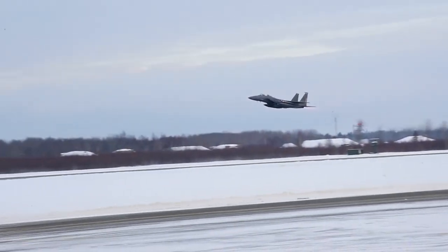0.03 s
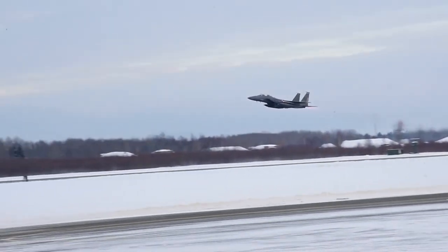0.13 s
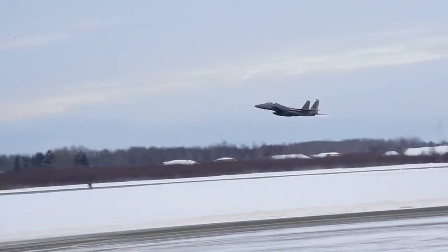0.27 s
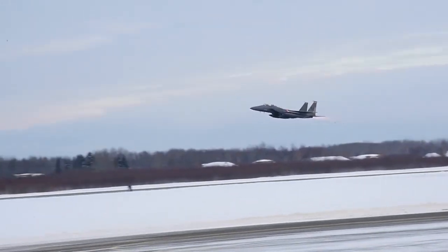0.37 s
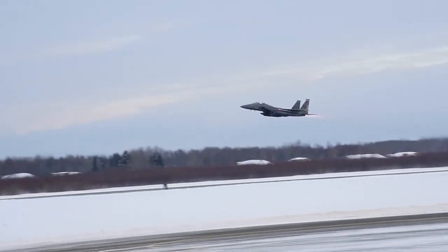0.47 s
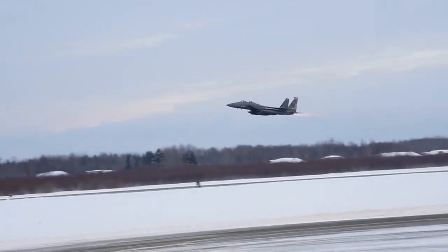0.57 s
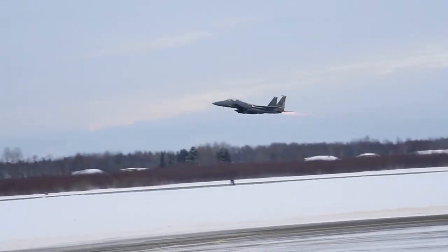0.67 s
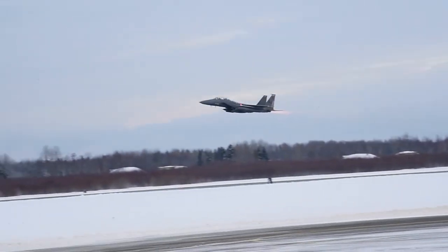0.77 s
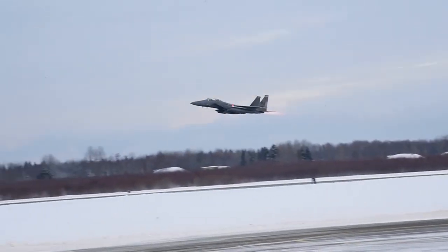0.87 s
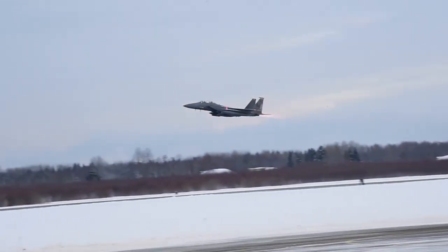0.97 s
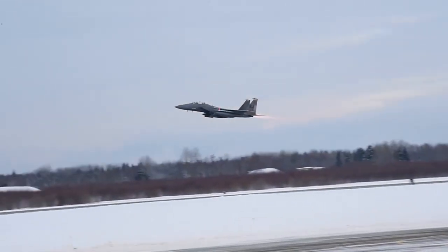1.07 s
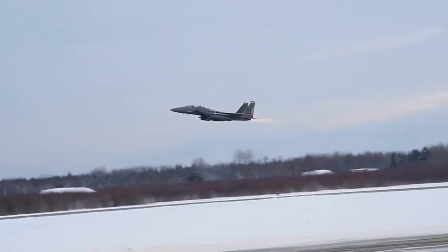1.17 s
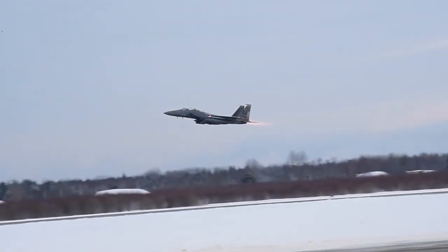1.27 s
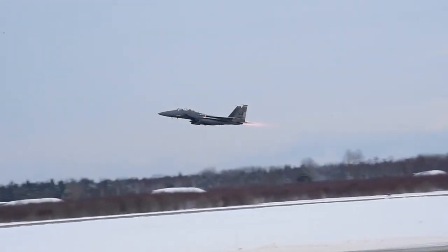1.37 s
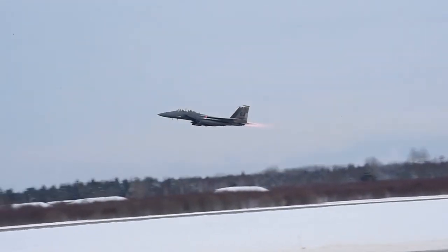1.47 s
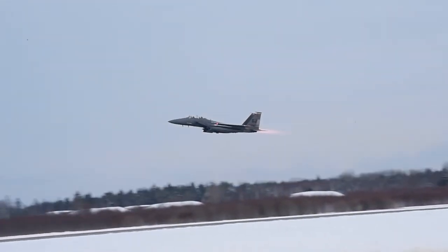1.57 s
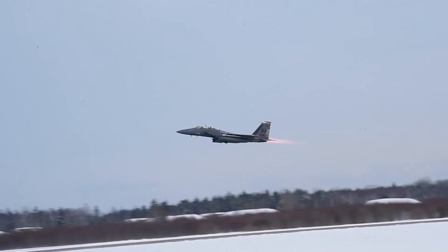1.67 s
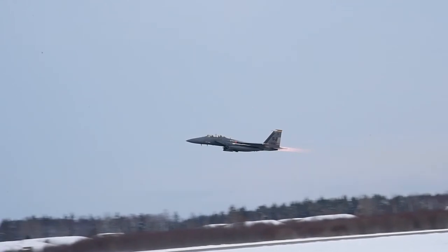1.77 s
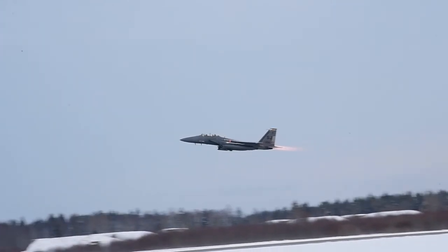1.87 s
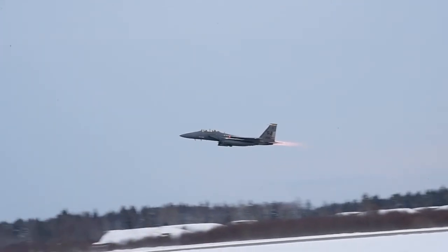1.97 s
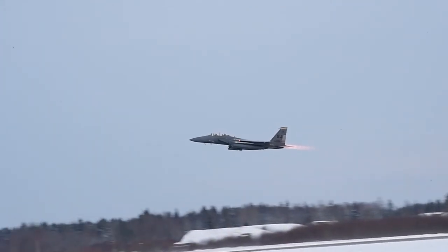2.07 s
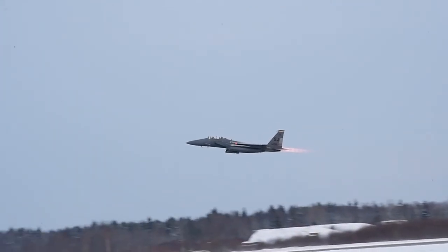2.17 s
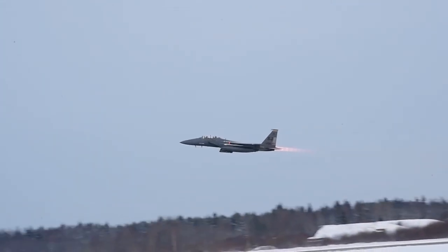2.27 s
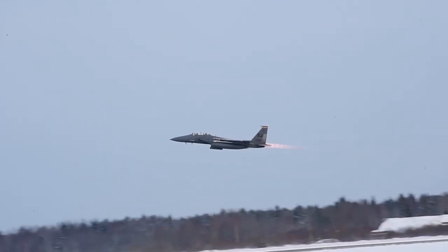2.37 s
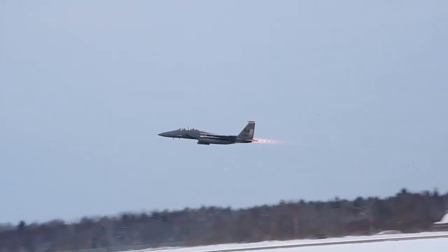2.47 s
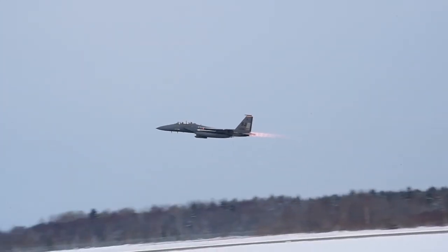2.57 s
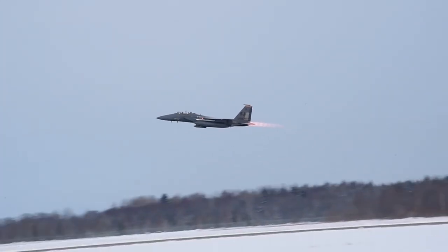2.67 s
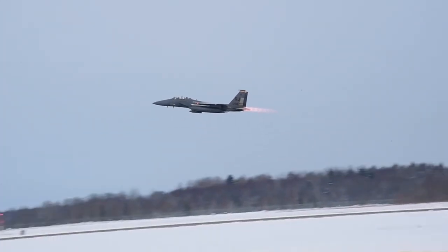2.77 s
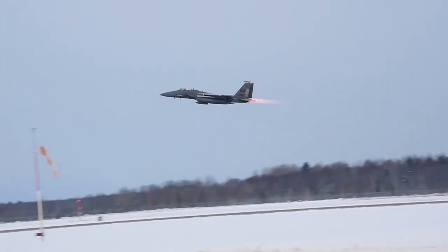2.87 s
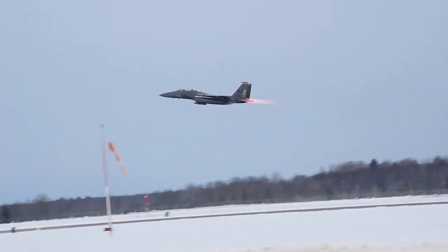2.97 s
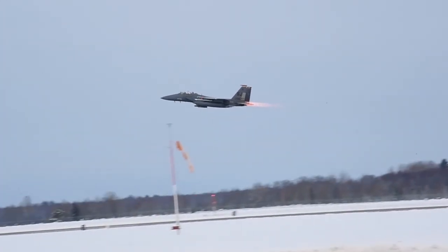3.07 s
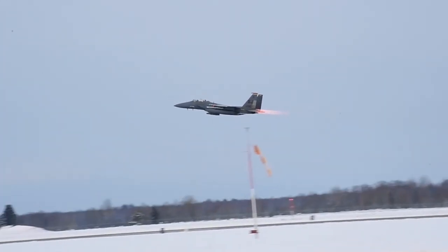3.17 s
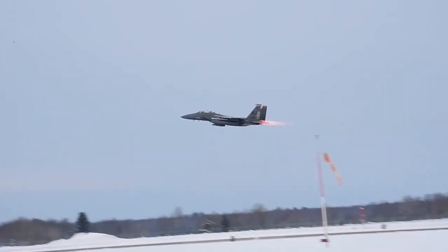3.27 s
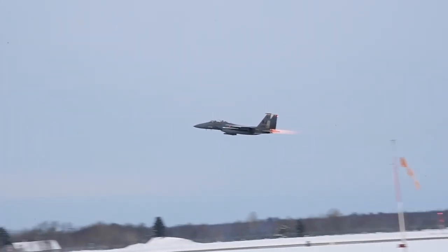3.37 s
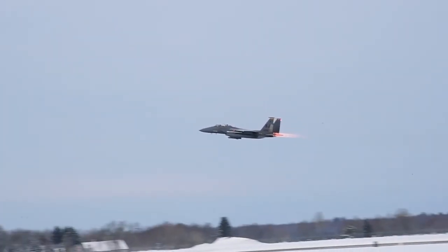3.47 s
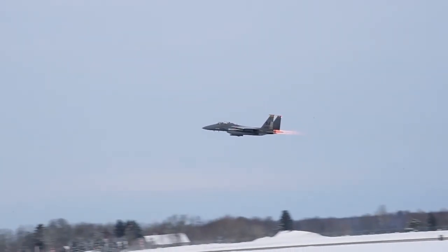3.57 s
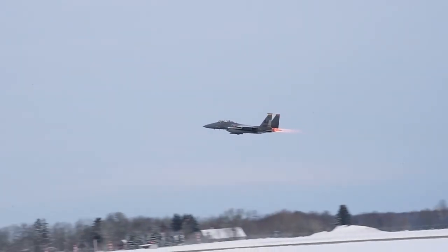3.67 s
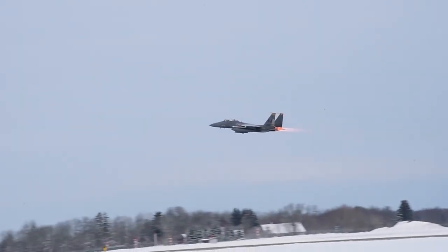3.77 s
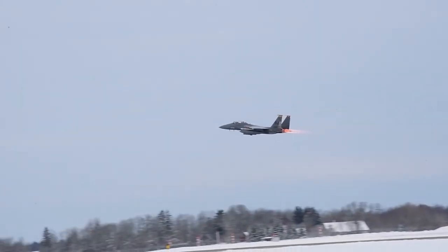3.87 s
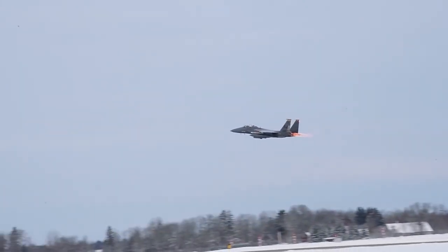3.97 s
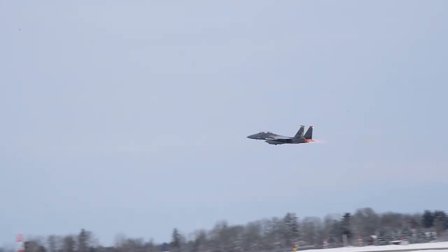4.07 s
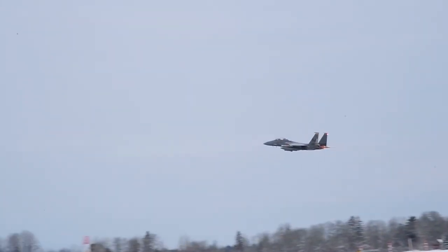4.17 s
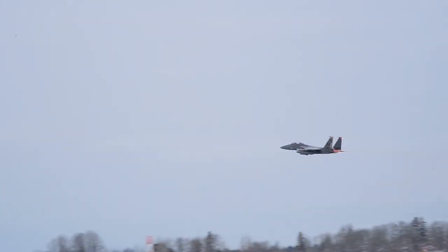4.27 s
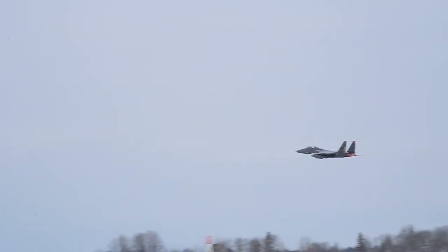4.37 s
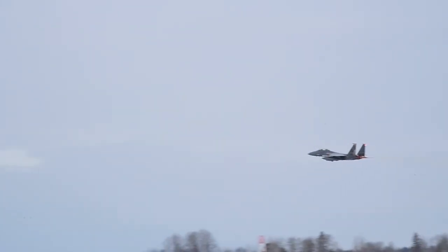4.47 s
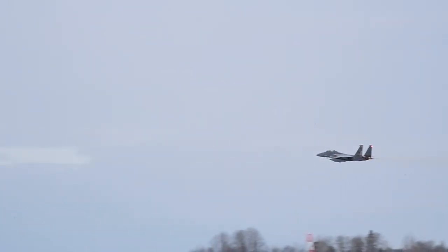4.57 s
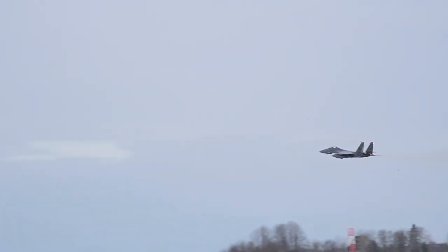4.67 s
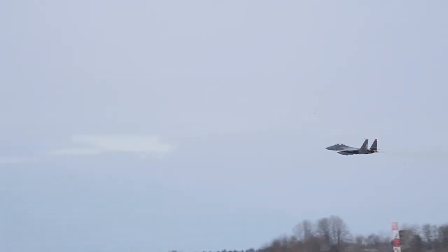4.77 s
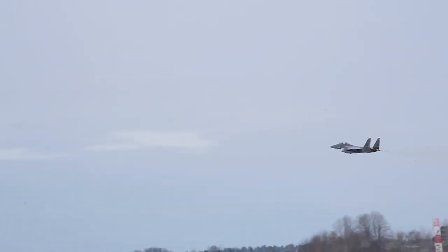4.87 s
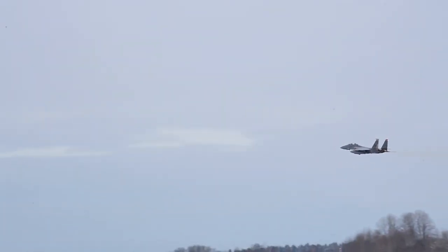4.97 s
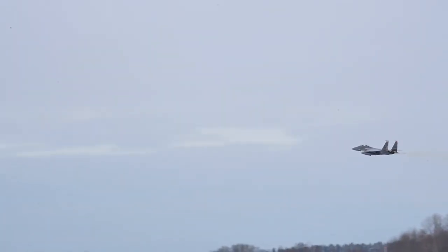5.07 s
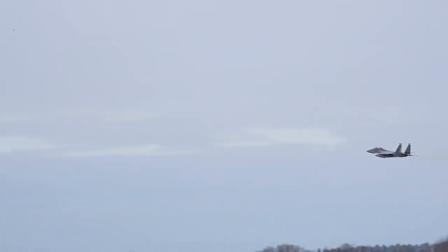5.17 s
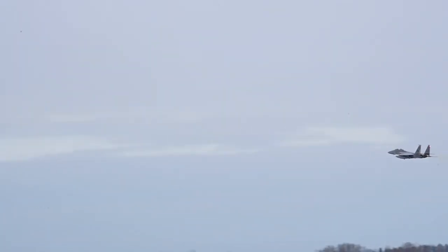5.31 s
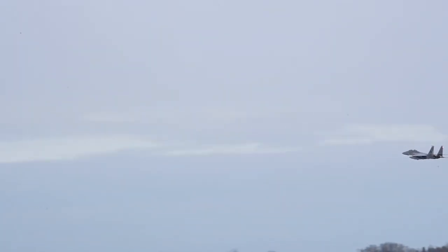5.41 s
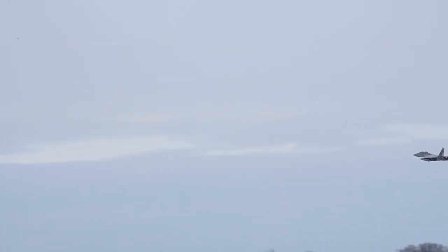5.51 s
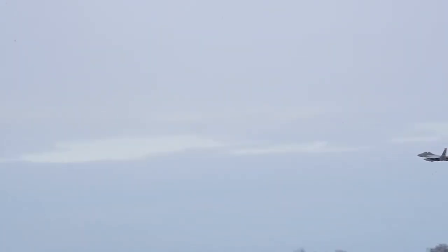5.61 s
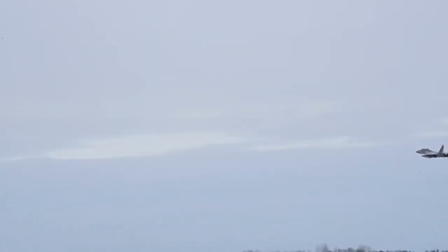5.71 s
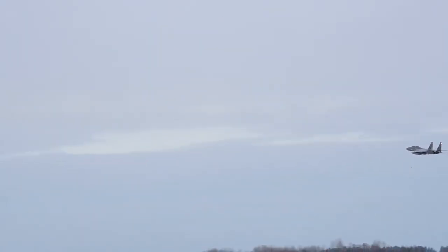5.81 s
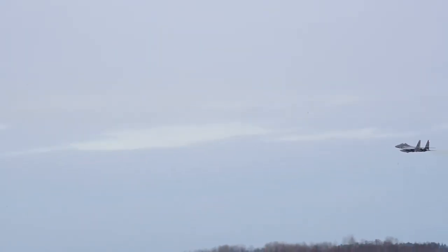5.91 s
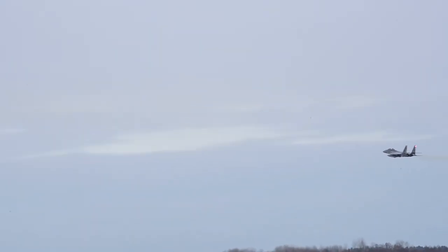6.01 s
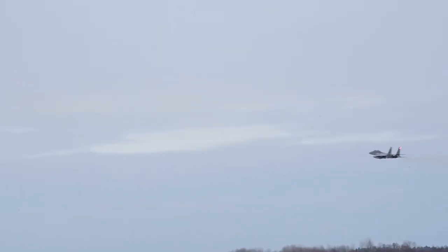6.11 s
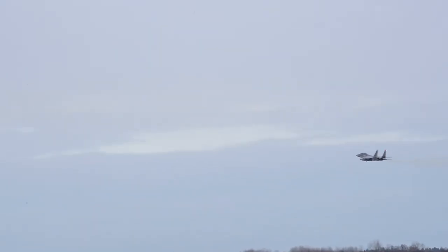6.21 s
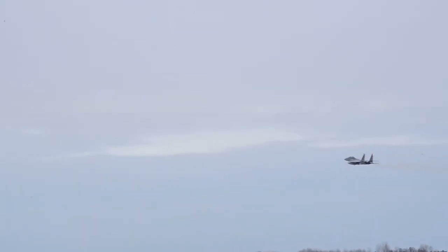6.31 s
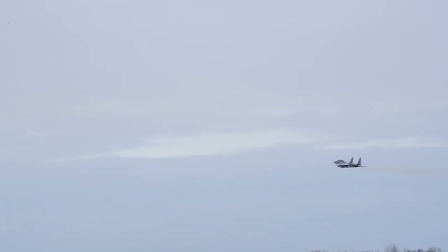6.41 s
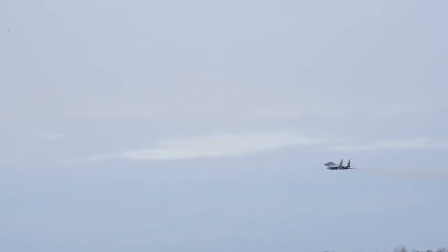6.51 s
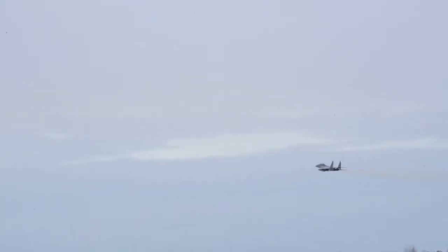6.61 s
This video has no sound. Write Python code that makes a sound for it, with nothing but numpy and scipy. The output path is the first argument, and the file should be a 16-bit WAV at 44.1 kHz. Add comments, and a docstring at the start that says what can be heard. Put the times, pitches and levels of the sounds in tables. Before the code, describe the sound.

A twin-engined fighter jet's afterburner roar swells from a dull rumble to a loud ripping, crackling blast, then stays heavy until an abrupt end.

```python
"""Jet exhaust: a twin-engined fighter lifts off on afterburner and climbs past over an open snowy airfield.
The roar is shaped noise in three bands: a howl that swells as the jet comes abeam, a rasp of fine turbulence
and a deep rumble that grows as the nozzles swing round. An uneven train of shock fronts makes it rip and
crackle, with single sharp cracks on top; faint bands of noise fade early and dull thunder comes off the field.
A closely spaced microphone pair hears it from the right, through a lag, a balance and scattered treble."""
import sys
import numpy as np
from scipy import signal
from scipy.fft import rfft, irfft
from scipy.io import wavfile
from scipy.ndimage import uniform_filter1d, minimum_filter1d

SR = 44100
rng = np.random.default_rng(int(sys.argv[2]) if len(sys.argv) > 2 else 0)


def digitize_waveform(pressure):
    """Quantize a signal to 16-bit integers and store it at the path in sys.argv[1].

    Rows of a 2-D input are taken as channels; values are limited to [-1, 1].
    """
    field = np.atleast_2d(pressure).T
    bounded = np.clip(field, -1, 1)
    quanta = np.round(bounded * 32767).astype(np.int16)
    wavfile.write(sys.argv[1], SR, quanta)


N = 293265  # length [samples]

# filter frames [samples], their times [s] and the frequencies of their bins [Hz]
FRAME, HOP = 2048, 256
FRAME_S = np.arange(N // HOP + 2) * HOP / SR
BIN_HZ = np.maximum(np.arange(FRAME // 2 + 1) * SR / FRAME, 1)

# moving air focuses the roar into brief surges or, with negative rises, thins it:
# (middle [s], length [s], rise of the roar [dB], rise of the crackle [dB])
SURGES = [(0.0, 0.027, 8.5, -1), (0.36, 0.06, 1.5, 6), (0.425, 0.039, 4, 0), (0.508, 0.085, 5, 11),
          (0.894, 0.06, 2.5, 6), (0.963, 0.045, 8, 11), (1.025, 0.1, 6, 4), (1.122, 0.1, 2, 9),
          (1.266, 0.17, 2.5, 6), (1.37, 0.057, 4.5, 18), (1.419, 0.062, 7.5, 12), (1.622, 0.15, 6.5, 20),
          (1.74, .08, -0.5, 0), (1.868, 0.11, 1.5, 9), (1.98, 0.06, 0.5, 7.5), (2.311, 0.17, 0.5, 9),
          (2.422, .06, -2, -4), (2.536, 0.13, 0.1, 6), (2.773, 0.054, 2.5, 4.5), (2.814, 0.063, -2, -10),
          (2.945, 0.44, -0.5, 3), (3.084, 0.1, -2.5, -10), (3.158, 0.046, 1, -1), (3.241, 0.045, -3.5, -15),
          (3.484, 0.17, 0.5, -2), (3.653, 0.16, -1.5, 5.5), (3.81, 0.077, 0.5, 3), (4.05, 0.068, 1, 4),
          (4.2, 0.088, 0, -1.5), (4.996, 0.07, -1, -2), (5.476, 0.11, -1.5, -3), (5.69, 0.1, 0.5, 3.5),
          (5.98, 0.13, 0.8, 5), (6.075, 0.09, -1.7, -2), (6.385, 0.073, 2, 7.5), (6.632, 0.055, 2.5, 5)]
# share of the roar's rise that these parts follow; long waves are bent less
HOWL_FOLLOWS, RUMBLE_FOLLOWS = 0.81, 0.11

# large eddies at the end of the plume, before gain and surges: (time [s], level [dB])
RUMBLE_LEVEL = [(0, -35), (0.42, -37.5), (0.7, -40.5), (1.6, -36), (2.3, -29), (2.75, -29), (2.95, -25.5),
                (3.4, -22.5), (4.2, -19), (4.6, -16.5), (5.3, -17.5), (6.1, -19), (6.6, -17)]
# rumble spectrum round its moving centre: (multiple of the centre, relative density [dB per Hz])
RUMBLE_COLOUR = [(.08, -59), (.18, -32.5), (.34, -20.5), (.52, -10), (.72, -3.5), (.95, -2), (1.25, -2),
                 (1.7, -7), (2.4, -14.5), (4.8, -56), (70, -150)]
# mixing noise of the jets, before gain and surges: (time [s], level [dB])
HOWL_LEVEL = [(0, -31.5), (0.8, -32), (0.97, -29), (1.2, -25.5), (1.5, -25.5), (1.75, -21.5), (2.3, -17),
              (2.68, -16), (2.88, -16.5), (3.15, -13.5), (3.35, -17), (3.85, -17), (4.18, -20.5),
              (4.3, -25), (4.5, -22.5), (4.65, -20.5), (4.8, -21), (5.05, -22), (5.8, -20), (6.65, -19)]
# howl spectrum round its moving centre: (multiple of the centre, relative density [dB per Hz])
HOWL_COLOUR = [(.1, -41), (.52, -13.5), (.7, -6.5), (.86, -0.5), (1, -0.5), (1.16, -1.5), (1.45, -8.5),
               (2, -12.5), (4, -44), (30, -130)]
# wavering pitch of the howl, highest near the pass abeam: (time [s], centre [Hz], width factor)
HOWL_PITCH = [(0, 527, 1.31), (.33, 580, 1.31), (.42, 413, 1.33), (.53, 565, 1.36), (1.0, 650, 1.23),
              (1.12, 660, 1), (1.25, 785, 1.28), (1.41, 605, 1.43), (1.6, 694, 1.66), (1.8, 645, 0.78),
              (2.1, 616, 0.9), (2.45, 690, 0.68), (2.68, 720.2, 0.76), (2.92, 810, 1.1),
              (3.15, 850.3, 0.95), (3.45, 765.4, 1.1), (3.8, 730, 1.02), (4.2, 627, 0.68),
              (4.45, 610, 0.79), (4.65, 688.1, 1.1), (4.85, 633, 0.86), (5.2, 610, 0.76), (5.65, 674, 0.82),
              (6.1, 580, 1.23), (6.65, 610, 0.72)]
# fine turbulence near the nozzles, before gain and surges: (time [s], level [dB])
RASP_LEVEL = [(0, -39), (0.85, -41.5), (1.2, -30.5), (1.5, -28.5), (1.75, -26.5), (2.1, -19), (2.3, -19),
              (2.6, -23.5), (2.8, -22.5), (2.97, -27.5), (3.1, -25.5), (3.28, -23), (3.41, -21), (3.5, -25),
              (3.62, -18), (3.85, -21), (4.03, -19.5), (4.2, -17), (4.35, -17.5), (4.5, -23), (4.75, -19.5),
              (4.92, -21.5), (5.3, -21), (5.47, -21.5), (5.68, -21.7), (5.85, -24.5), (6.05, -21.5),
              (6.4, -21.5), (6.55, -27), (6.65, -23.5)]
# rasp spectrum round its moving centre: (multiple of the centre, relative density [dB per Hz])
RASP_COLOUR = [(.2, -37), (.52, -17), (.73, 5.5), (1, 6), (1.3, -1), (1.6, -10.5), (2.1, -14.5), (3, -27.5),
               (5, -52), (14, -100)]
# colour as the aircraft passes:
# (time [s], rumble centre [Hz], rasp centre [Hz], rasp width factor, crackle tilt [dB per octave])
PASS_COLOUR = [(0, 215, 1220, 0.72, -6), (1.1, 205, 1255, 1.27, -7.5), (1.6, 205.6, 1420, 1.26, -6),
               (2.0, 224, 1440, 1.34, -2), (2.5, 268, 1680, 1.297, -0.9), (3.2, 268, 1950, 1.23, 1),
               (3.42, 256, 1800, 0.97, -0.5), (3.75, 266, 2000, 1.04, -1), (4.05, 267, 1570, 0.88, -1),
               (4.2, 259.8, 1400, 0.88, -0.5), (4.7, 245, 1795, 1.11, 2.5), (5.2, 234, 1690, 1.05, 3.5),
               (5.7, 256, 1784, 0.92, 2.2), (6.2, 272, 1371, 0.89, -2.5), (6.65, 254, 1520, 0.95, -6)]
RUMBLE_DB, HOWL_DB, RASP_DB = 0.5, 0.5, -0.4  # gain of each part of the roar
# the ground echo hollows the roar between howl and rasp; positive levels fill it:
# (time [s], centre [Hz], level [dB])
HOLLOW = [(0, 830, -0.5), (1.5, 795, -3), (2.1, 900, 1.5), (2.6, 1270, 2), (3.1, 1510, -6),
          (3.6, 1252, -0.5), (4.3, 969.5, 0), (5.2, 880, -1), (5.7, 1020, 0), (6.3, 880, -3.5)]
HOLLOW_OCTAVES = 0.25

# thunder from the field: (frequency [Hz], relative density [dB per Hz])
FIELD_COLOUR = [(20, -30), (45, -26), (80, -13.5), (130, 0), (200, -3), (400, -25), (2000, -70)]
# faint early bands of noise, two narrow and one broad, before their fade:
# (centre [Hz], width [Hz], level [dB])
FAINT_BANDS = [(2570, 160, -78), (4100, 300, -69), (7600, 1100, -77)]
FAINT_BANDS_END_S = 1.5

# shock fronts, their share before the bass is spared and the limits on share and power:
# (time [s], fronts per second [1/s], share of the roar [0-1], power of a front's height that gives its treble)
SHOCKS = [(0, 210, 0.2, 2), (.8, 223, 0.2, 3), (1.1, 294, 0.07, 3.5), (1.4, 356, 0.5, 4.2),
          (1.6, 427, 0.74, 5.5), (2.0, 560, 0.64, 2.6), (2.6, 504, 0.68, 3.5), (3.2, 413, 0.28, 1.78),
          (4.2, 340, 0.51, 0.95), (4.7, 311, 0.76, 0.76), (5.6, 285, 0.65, 1.1), (6.2, 263, 0.6, 2.4)]
# steep edges of the shock fronts, before gain and surges: (time [s], level [dB])
CRACKLE_LEVEL = [(0, -79), (0.8, -71), (1.2, -58), (1.5, -57.5), (1.78, -58.5), (2.1, -44.5), (3.0, -43.5),
                 (4.2, -44), (4.35, -38.5), (4.5, -41.5), (4.8, -39.5), (5.1, -41.5), (5.7, -42),
                 (5.9, -46), (6.3, -50), (6.6, -51.5)]
# spectrum of the crackle before any tilt: (frequency [Hz], relative density [dB per Hz])
CRACKLE_COLOUR = [(20, -110), (800, -26.5), (2000, 3), (3000, 3), (4200, 1), (5400, -2), (6500, -3),
                  (8000, -5.5), (10000, -14), (12500, -27.5), (15000, -37)]
# the sharpest single cracks, before the gain of their bright edge: (time [s], height of the treble [dB])
CRACKS = [(0.511, -42), (0.9592, -39), (1.2026, -39), (1.218, -31), (1.234, -30), (1.262, -31),
          (1.3089, -41), (1.362, -24), (1.3668, -27), (1.392, -26), (1.4101, -34), (1.4206, -26),
          (1.558, -33), (1.5673, -30), (1.5842, -24), (1.5919, -24), (1.6211, -16), (1.6265, -17),
          (1.6344, -19), (1.6446, -25), (1.6628, -24), (1.6723, -28), (1.7626, -31), (1.8666, -25),
          (1.8864, -25), (1.9482, -24), (1.967, -20), (1.9971, -24), (2.239, -22), (2.2722, -24),
          (2.4619, -19), (2.4862, -12), (2.507, -20), (2.6368, -12), (2.7215, -16), (2.8765, -15),
          (2.9616, -22), (2.9885, -18), (3.056, -16.5), (3.1258, -21), (3.206, -18), (3.2954, -19),
          (3.4014, -16), (3.5123, -15.5), (3.6466, -19), (3.695, -24), (4.0113, -19), (4.265, -18.5),
          (4.2906, -15), (4.9036, -14), (5.087, -20), (5.1351, -22), (5.2506, -22), (5.8091, -17),
          (5.8507, -18), (5.9222, -24), (5.9403, -22), (5.9555, -23), (5.9819, -26), (6.0218, -15),
          (6.0361, -18), (6.046, -15.5), (6.0672, -27), (6.0957, -30), (6.1889, -13.5), (6.2045, -18),
          (6.2462, -25), (6.3317, -31), (6.3704, -26), (6.396, -28), (6.4205, -22), (6.4842, -26),
          (6.5024, -27), (6.5534, -28), (6.636, -22.5)]
SWALLOW_S = 0.0019  # a crack swallows the smaller fronts within this span, centred on it

# direction of the sound:
# (time [s], factor on the lag between capsules, extra scatter [dB], left minus right to add [dB])
BEARING = [(0, 0.51, 16, 8.5), (.7, 0.69, 9, 7), (1.2, 0.79, 4, 5), (2.0, 0.96, 1.5, 4),
           (2.6, 0.97, 1.5, 3.5), (3.2, 1, 4, 4), (3.8, 0.94, 0.5, 4), (4.4, 0.89, 4.5, 4.5),
           (5.6, 0.88, 4.5, 3.5), (6.65, 0.62, 7, 5.5)]
# microphone pair, before bearing:
# (frequency [Hz], sensitivity [dB], left minus right [dB], share of scattered sound [0-1])
PAIR = [(310, -0.5, -4, 0), (730, 1.3, -5, 0), (1310, 1.5, -5.5, 0.04), (1900, 5, -7.5, 0),
        (2620, 6, -4, 0.07), (3800, 3, -4, 0.02), (5060, 4, -5.5, 0.06), (8200, -3.5, -6, 0.15),
        (13800, 9, -4, 0.12)]
# lag of the pair, before bearing: (frequency [Hz], phase by which right leads [radians])
PAIR_PHASE = [(300, 0.033), (650, 0.4), (1000, 0.68), (1400, 1.65), (2000, 1.85), (2900, 2.48), (3800, 3.4),
              (5500, 4.53), (7000, 6.04), (11000, 8.2), (15000, 9.6)]
# level of the upper mids round PRESENCE_HZ, which dips and later rises: (time [s], level [dB])
PRESENCE = [(0, 2), (2.0, -4), (3.1, -1), (3.5, -1), (4.3, 1.5), (4.7, 5.5), (5.3, 6), (5.8, 5), (6.65, 0)]
PRESENCE_HZ, PRESENCE_OCTAVES = 3750, 0.24
CUTOFF_HZ = 15200


def from_db(db):
    """Decibels to gain."""
    return 10 ** (np.asarray(db) / 20)


def in_time(rows, at=FRAME_S):
    """The columns of a curve at the given times."""
    times, *columns = np.transpose(rows)
    return [np.interp(at, times, column) for column in columns]


def at_hz(rows, hz=BIN_HZ):
    """The columns of a spectrum, joined on a log-frequency axis."""
    points, *columns = np.transpose(rows)
    return [np.interp(np.log(hz), np.log(points), column) for column in columns]


def bell(centre_hz, octaves):
    """Weight by frequency, 1 at a centre that may move from frame to frame."""
    distance = np.log2(BIN_HZ / np.reshape(centre_hz, (-1, 1)))
    return np.exp(-(distance / octaves) ** 2)


def above(hz, corner_hz):
    """Weight that rises steeply from 0 to 1 round a corner."""
    return 1 / (1 + (corner_hz / hz) ** 4)


def drift(rate_hz):
    """Slow random wander, one value a frame, spread 1."""
    r = np.exp(-2 * np.pi * rate_hz * HOP / SR)
    count = len(FRAME_S)
    noise = rng.standard_normal(2 * count)
    # the first half only lets the filter settle
    slow = signal.lfilter([1], [1, -2 * r, r * r], noise)[count:]
    return slow / slow.std()


def evened(x, span_s):
    """Bring the running power to 1."""
    running_power = uniform_filter1d(x * x, max(int(span_s * SR), 2))
    return x / np.sqrt(np.maximum(running_power, 0) + 1e-12)


def through(x, response):
    """Pass a signal through a filter that changes from frame to frame, by overlapping windows."""
    count, lead = len(FRAME_S), FRAME // 2 - HOP
    index = HOP * np.arange(count)[:, None] + np.arange(2 * HOP)
    pieces = np.pad(x, (HOP, FRAME))[index] * signal.get_window("hann", 2 * HOP)
    filtered = irfft(rfft(pieces, FRAME) * response)
    # centre each piece in its frame, so that ringing before and after it both fit
    filtered = np.roll(filtered, lead, axis=1) * signal.get_window(("tukey", .5), FRAME)
    out = np.zeros(count * HOP + FRAME)
    for k, piece in enumerate(filtered):
        out[k * HOP:k * HOP + FRAME] += piece
    return out[lead + HOP:lead + HOP + N]


def pulse(power, lean):
    """Response with this power; lean 1 gives a steep front and a rebound, lean 0 a symmetric spike."""
    cepstrum = irfft(.5 * np.log(power + 1e-18))
    cepstrum[:, 1:FRAME // 2] *= 1 + lean
    cepstrum[:, FRAME // 2 + 1:] *= 1 - lean
    return np.exp(rfft(cepstrum))


def layer(colour, level_db, flutter_db, centre_hz=1, width=1, tilt_db=0):
    """Power by frame and frequency of one layer; turbulent air makes its level flutter."""
    centre_hz, width, tilt_db = [np.reshape(v, (-1, 1)) for v in (centre_hz, width, tilt_db)]
    place = (BIN_HZ / centre_hz) ** (1 / width)
    shape = from_db(at_hz(colour, place)[0] + tilt_db * np.log2(place)) ** 2
    shape = shape / shape.mean(axis=1, keepdims=True)
    level = from_db(level_db + flutter_db * drift(3.2))
    return shape * level[:, None] ** 2


def surges():
    """Each surge swells and fades as one broad arch: (rise of the roar, rise of the crackle) in dB."""
    roar_db, crackle_db = 0, 0
    for middle_s, length_s, roar_rise_db, crackle_rise_db in SURGES:
        arch = 1 - np.minimum(np.abs(2 * (FRAME_S - middle_s) / length_s), 1) ** 3
        roar_db = roar_db + roar_rise_db * arch
        crackle_db = crackle_db + crackle_rise_db * arch
    return roar_db, crackle_db


def rumble(surge_db):
    """Power of the deep noise that large eddies make at the end of the plume."""
    level_db = in_time(RUMBLE_LEVEL)[0] + RUMBLE_DB + RUMBLE_FOLLOWS * surge_db
    centre_hz = in_time(PASS_COLOUR)[0]
    return layer(RUMBLE_COLOUR, level_db, flutter_db=0.5, centre_hz=centre_hz, width=0.88)


def howl(surge_db):
    """Power of the jets' mixing noise, a broad band whose centre moves as the aircraft passes."""
    level_db = in_time(HOWL_LEVEL)[0] + HOWL_DB + HOWL_FOLLOWS * surge_db
    centre_hz, width = in_time(HOWL_PITCH)
    return layer(HOWL_COLOUR, level_db, flutter_db=0.65, centre_hz=centre_hz, width=width)


def rasp(surge_db):
    """Power of the fine turbulence near the nozzles, which follows the surges in full."""
    level_db = in_time(RASP_LEVEL)[0] + RASP_DB + surge_db
    _, centre_hz, width, _ = in_time(PASS_COLOUR)
    return layer(RASP_COLOUR, level_db, flutter_db=2.0, centre_hz=centre_hz, width=width)


def ground_echo():
    """Power factor of the moving hollow where the ground echo meets the direct sound."""
    centre_hz, level_db = in_time(HOLLOW)
    return from_db(level_db[:, None] * bell(centre_hz, HOLLOW_OCTAVES)) ** 2


def field_thunder():
    """Power of the dull thunder that comes back from the field and the tree line."""
    return layer(FIELD_COLOUR, level_db=-44.0, flutter_db=3.0)


def faint_bands():
    """Power of the faint bands of noise heard early on, two narrow and one broad, that fade."""
    power = 0
    for centre_hz, width_hz, level_db in FAINT_BANDS:
        band = np.exp(-2 * ((BIN_HZ - centre_hz) / width_hz) ** 2)
        power = power + band / band.mean() * from_db(level_db) ** 2
    fade = np.clip(1 - (FRAME_S / FAINT_BANDS_END_S) ** 2, 0, 1)
    return fade[:, None] * power


def shock_train(spread_db, bunch_db):
    """Fronts at uneven gaps; a strong one has swallowed its neighbours, so it follows a longer gap."""
    count = 6000  # more fronts than the scene can hold
    per_s = in_time(SHOCKS)[0]
    gaps = rng.gamma(4, 1 / 4, count)  # mean 1
    # a front falls due each time the running count of expected fronts has grown by one gap
    at_s = np.interp(np.cumsum(gaps), np.cumsum(per_s) * HOP / SR, FRAME_S)
    bunching = np.interp(at_s, FRAME_S, drift(62))
    sizes = np.sqrt(gaps) * from_db(spread_db * rng.standard_normal(count) + bunch_db * bunching)
    index = (at_s * SR).astype(int)
    inside = index < N
    train = np.zeros(N)
    train[index[inside]] = np.tanh(sizes[inside] / 2)
    return train


def scattered(train, decay_s):
    """Each front becomes a short dying burst of noise with the same energy."""
    r = np.exp(-1 / (decay_s * SR))
    energy = signal.lfilter([1 - r], [1, -r], train ** 2 + 1e-18)
    return np.sqrt(energy) * rng.standard_normal(N)


def roar(train, power):
    """Smooth mixing noise and shock fronts share one spectrum: (direct, diffuse) sound."""
    # the fronts are too short to carry the deepest bass
    share = np.clip(in_time(SHOCKS)[1], .01, .95)[:, None] * above(BIN_HZ, corner_hz=150)
    # soft limiting evens the heights of the fronts
    train = evened(np.tanh(train / 0.5), span_s=0.038)
    fronts = pulse(power * share, lean=0.5)
    smooth = np.sqrt(power * (1 - share))
    direct = through(-train, fronts) + through(rng.standard_normal(N), smooth)
    diffuse = through(scattered(train, decay_s=0.00058), fronts) + through(rng.standard_normal(N), smooth)
    return np.array([direct, diffuse])


def steep_edges(edges, power, scatter_db, hiss_db):
    """Steep fronts with scatter; spurts of hiss surround them, before and after: (direct, diffuse) sound."""
    nearby = np.sqrt(np.maximum(uniform_filter1d(edges ** 2, int(.005 * SR)), 0))
    hiss = from_db(hiss_db) * nearby * rng.standard_normal((2, N))
    direct = -edges + from_db(scatter_db) * scattered(edges, decay_s=0.00052)
    diffuse = scattered(edges, decay_s=0.00055)
    colour = pulse(power, lean=0.67)
    return np.array([through(x, colour) for x in np.array([direct, diffuse]) + hiss])


def crackle(train, surge_db, tallest, cluster_db, gain_db):
    """Strong fronts are also the steepest, so they carry most of the treble; they tear in uneven clusters."""
    level_db = in_time(CRACKLE_LEVEL)[0] + surge_db
    tilt_db = in_time(PASS_COLOUR)[3]
    steepening = np.clip(in_time(SHOCKS, np.arange(N) / SR)[2], 1, 8)
    level = from_db(np.interp(np.arange(N) / SR, FRAME_S, level_db + cluster_db * drift(37)))
    edges = tallest * np.tanh(evened(train ** steepening, span_s=0.053) / tallest)
    # faint, distant fronts have lost their top in the air
    dull_db = .45 * np.minimum(level_db + 57.5, 0)
    power = layer(CRACKLE_COLOUR, gain_db, flutter_db=2.07, tilt_db=tilt_db + dull_db)
    return steep_edges(evened(edges, span_s=.1) * level, power, scatter_db=-2.5, hiss_db=-7)


def crack_train():
    """The single cracks as clicks of their own heights."""
    clicks = np.zeros(N)
    for time_s, height_db in CRACKS:
        clicks[int(time_s * SR)] = from_db(height_db)
    return clicks


def single_cracks(clicks):
    """The bright steep edges of the sharpest fronts: (direct, diffuse) sound."""
    bright = layer(CRACKLE_COLOUR, level_db=8.5, flutter_db=0, tilt_db=3)
    return steep_edges(clicks, bright, scatter_db=-3, hiss_db=-11)


def microphones(direct, diffuse):
    """The right capsule hears the jet first; the bass is common to both, scatter sets the treble apart."""
    lag_factor, scatter_db, pan_db = [column[:, None] for column in in_time(BEARING)]
    gain_db, balance_db, apart = at_hz(PAIR)
    gain_db = gain_db + in_time(PRESENCE)[0][:, None] * bell(PRESENCE_HZ, PRESENCE_OCTAVES)
    phase = at_hz(PAIR_PHASE)[0] * lag_factor
    apart = np.clip(apart * from_db(scatter_db) ** 2, 0, .5)
    channels = []
    for side in (1, -1):  # left, right
        offset = side * above(BIN_HZ, corner_hz=322) ** 2
        level = from_db(gain_db + offset * (balance_db + pan_db) / 2)
        capsule = level * np.exp(-.5j * offset * phase)
        common = through(direct, capsule * np.sqrt(1 - apart))
        # scatter enters the two sides with opposite sign
        channels.append(common + through(diffuse, capsule * offset * np.sqrt(apart)))
    return np.array(channels)


def scene():
    """One train of shocks runs through the roar and its crackle; surges move them together."""
    surge_db, crackle_surge_db = surges()
    power = (rumble(surge_db) + howl(surge_db) + rasp(surge_db)) * ground_echo()
    power = power + field_thunder() + faint_bands()
    cracks = crack_train()
    clear_of_cracks = minimum_filter1d(1. * (cracks == 0), max(int(SWALLOW_S * SR), 1))
    train = shock_train(spread_db=0.23, bunch_db=1.42) * clear_of_cracks
    # each single crack is also a front of full height within the roar
    sound = roar(train + (cracks > 0), power)
    sound = sound + crackle(train, crackle_surge_db, tallest=23, cluster_db=2.0, gain_db=5.0)
    sound = sound + single_cracks(cracks)
    return microphones(*sound)


def record(dry):
    """The highest peaks are rounded, the sound opens without a click and the top is cut."""
    top = .95  # full scale is 1
    rounded = dry / (1 + (dry / top) ** 16) ** (1 / 16)
    opening = np.minimum(np.arange(N) / (.003 * SR), 1)
    top_cut = signal.ellip(10, .1, 80, CUTOFF_HZ, fs=SR, output="sos")
    return signal.sosfilt(top_cut, rounded * opening)


dry = scene()
out = record(dry)
digitize_waveform(out)
```